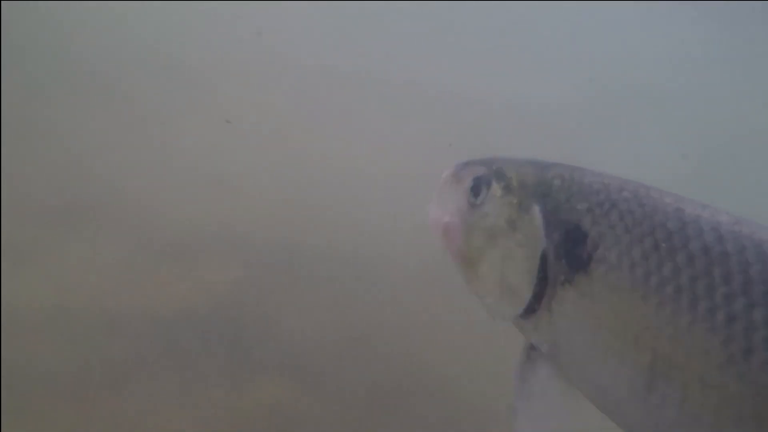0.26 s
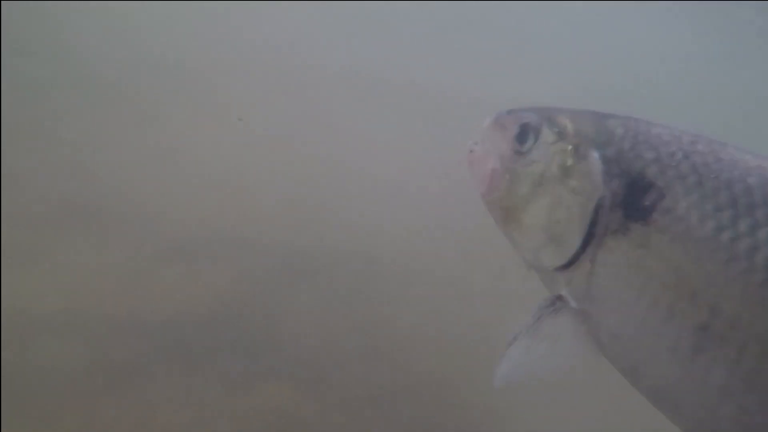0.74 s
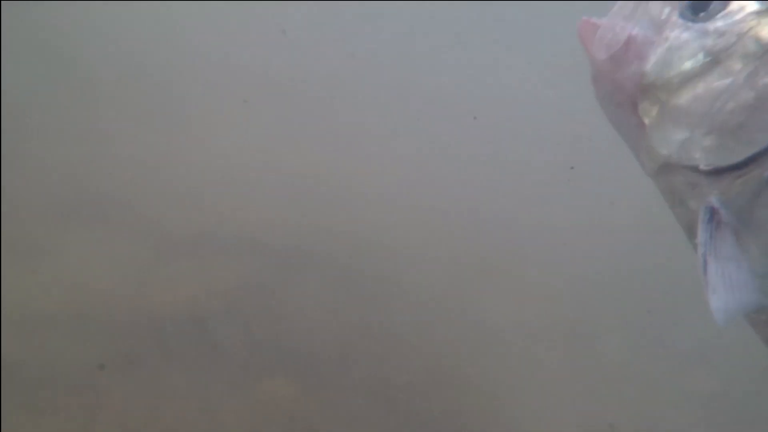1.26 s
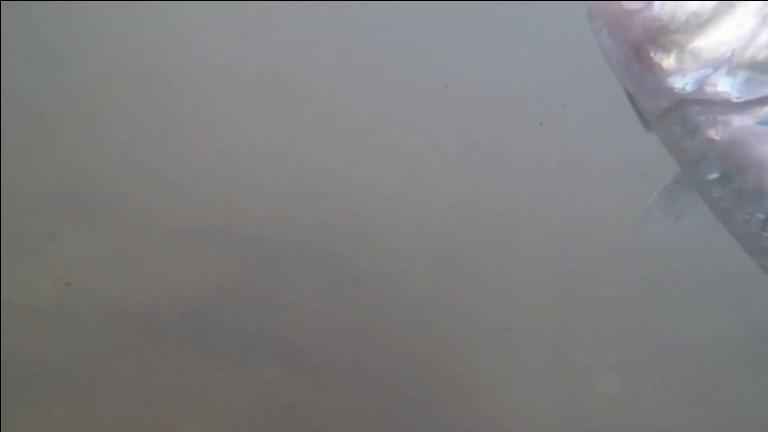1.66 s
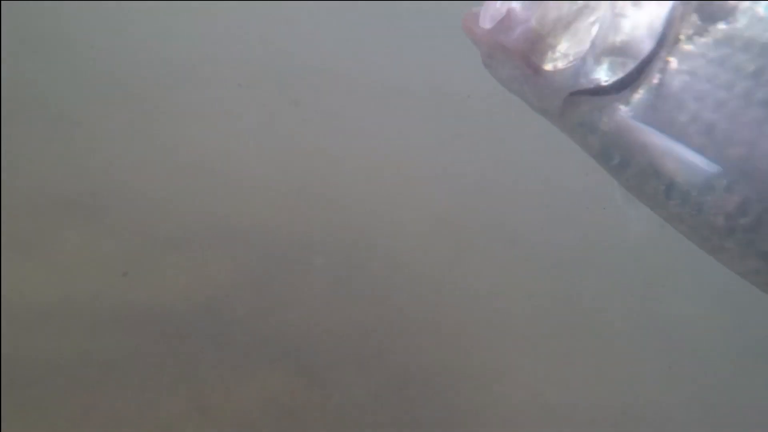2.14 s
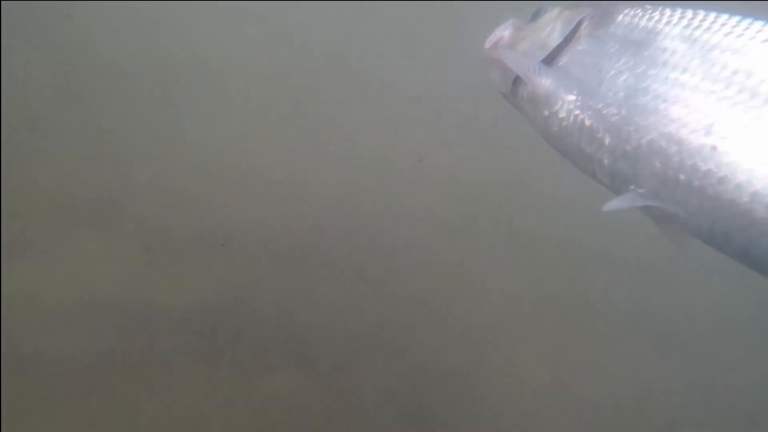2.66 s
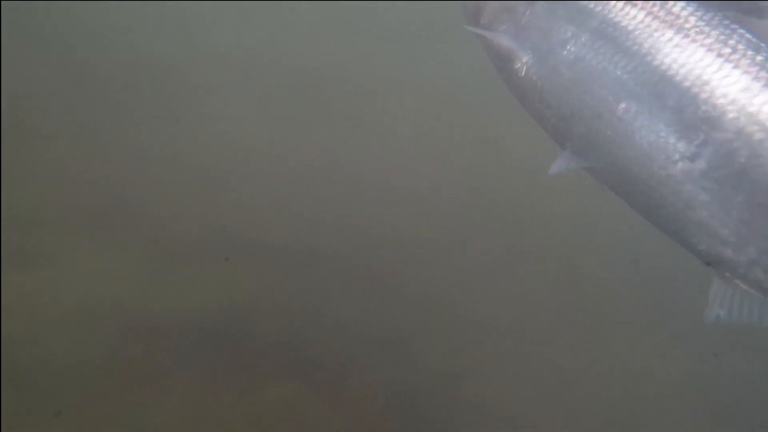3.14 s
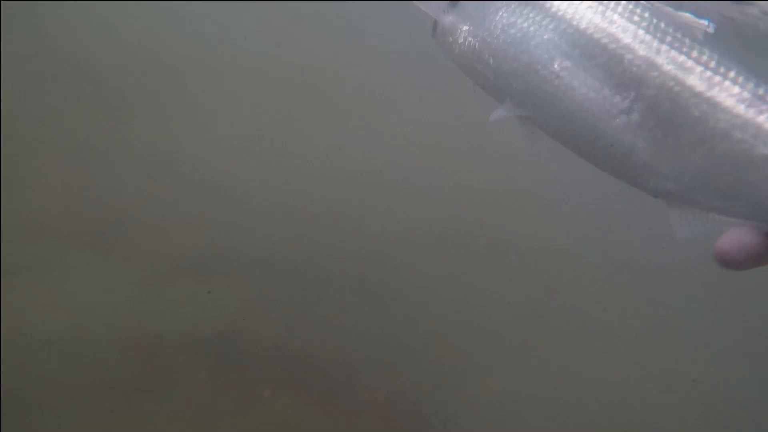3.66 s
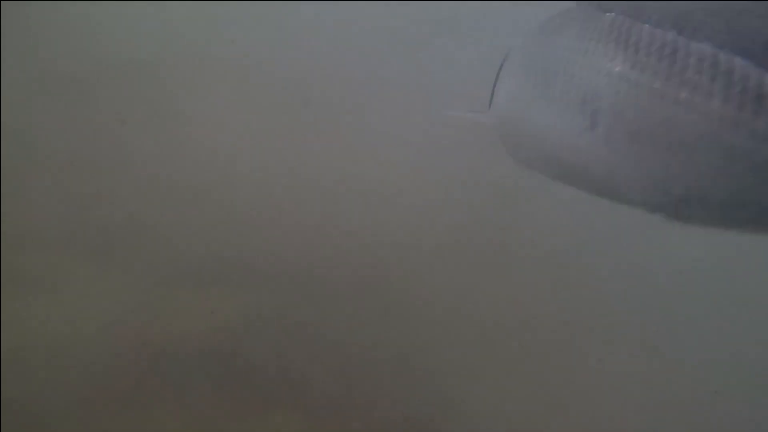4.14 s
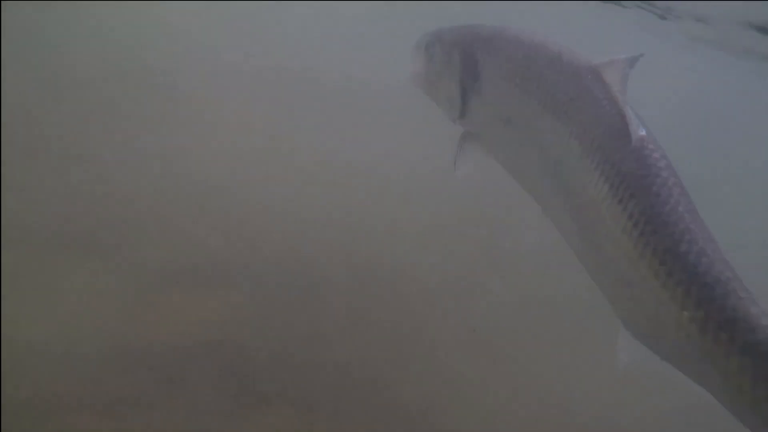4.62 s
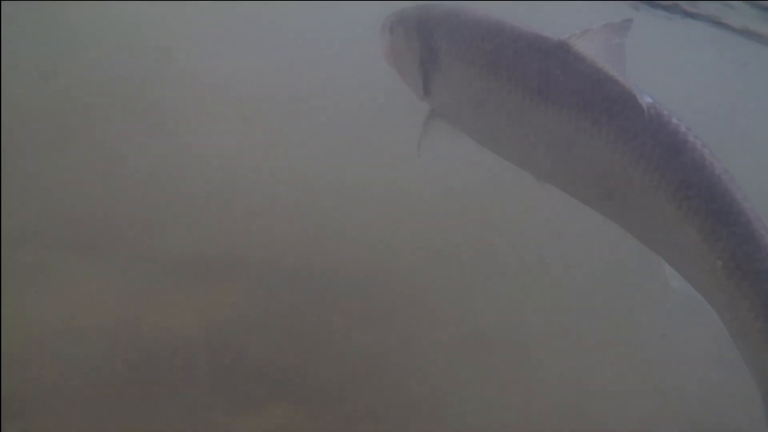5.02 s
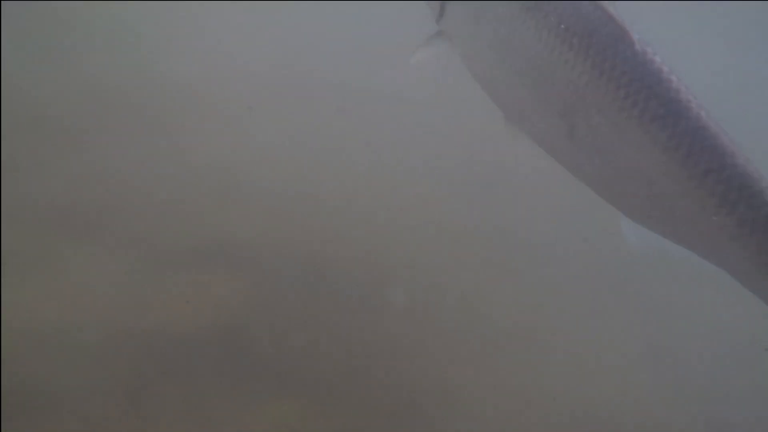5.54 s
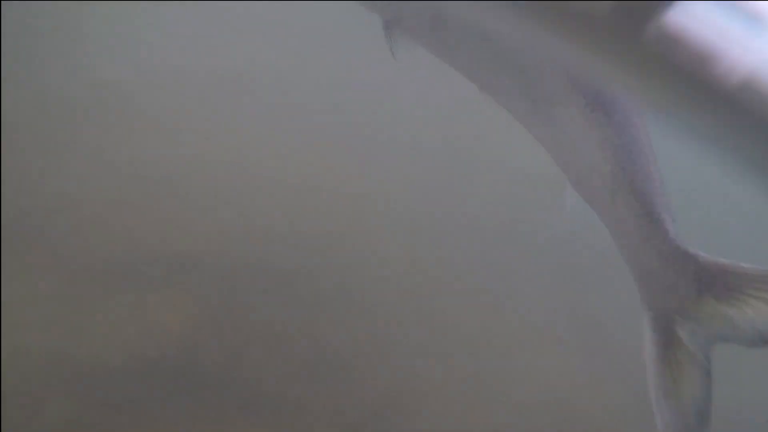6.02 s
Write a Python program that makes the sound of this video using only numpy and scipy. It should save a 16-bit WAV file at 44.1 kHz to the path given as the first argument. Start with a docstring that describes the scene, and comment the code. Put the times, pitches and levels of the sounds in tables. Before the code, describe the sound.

A muffled, surging underwater rumble of river current, with small bubble glugs, soft thumps and a few faint hollow knocks.

```python
"""River water streams round a submerged camera, its turbulent pressure heard as a surging rumble.
The flow drives the hollow housing's resonances and silt prickles on the glass, over the preamp's hiss.
Bubbles glug as damped oscillators and single eddies thump. Drifting grit and the tether knock the shell,
water sloshes along it, and sand and grit tick and snap."""
import sys
import numpy as np
from scipy import signal
from scipy.fft import rfft, irfft
from scipy.io import wavfile
from scipy.ndimage import uniform_filter1d

SR = 44100
rng = np.random.default_rng(int(sys.argv[2]) if len(sys.argv) > 2 else 0)


def inscribe(sig):
    """Save sig as 16-bit PCM at rate SR to the path in sys.argv[1].

    A 1-D sig is mono; a 2-D sig holds one channel per row.
    Samples are clipped to [-1, 1] before scaling.
    """
    pcm = np.round(np.clip(np.atleast_2d(sig).T, -1, 1) * 32767)
    wavfile.write(sys.argv[1], SR, pcm.astype(np.int16))


N = 277210


def undb(db):
    """Decibels to amplitude ratio."""
    return 10 ** (np.asarray(db) / 20)


def at_rms(x, db):
    """Scale x to an rms level."""
    return x * undb(db) / np.sqrt(np.mean(x ** 2))


def spectral_gain(spectrum, hz):
    """Gain of a (frequency_hz, level_db) table, interpolated in log frequency."""
    points_hz, db = np.transpose(spectrum)
    return undb(np.interp(np.log(np.maximum(hz, 1)), np.log(points_hz), db, left=-90))


def wander(rate_hz):
    """Slow random modulation: held values, smoothed twice."""
    hold = int(SR / rate_hz)
    steps = np.repeat(rng.standard_normal(N // hold + 1), hold)
    return uniform_filter1d(uniform_filter1d(steps, hold), hold)[:N]


def steady(x, window_s):
    """Compression: dividing by the running amplitude flattens most swells longer than the window."""
    size = int(window_s * SR)
    power = uniform_filter1d(uniform_filter1d(x ** 2, size), size).clip(0)
    return x / (power + 1e-12) ** .48


def add(out, start_s, x):
    """Superpose x on out from start_s."""
    i = max(int(start_s * SR), 0)
    out[i:i + len(x)] += x[:N - i]


def damped_sine(hz, rise_s, t60_s, octaves_per_s=0):
    """A damped oscillator: it swells to 1, then decays exponentially by 60 dB."""
    t = np.arange(int((rise_s + t60_s) * SR) + 8) / SR - rise_s
    envelope = np.where(t < 0, np.cos(np.pi / 2 * t / rise_s) ** 2, np.exp(-np.log(1000) * t / t60_s))
    return envelope * np.sin(2 * np.pi * np.cumsum(hz * 2 ** (octaves_per_s * t)) / SR)


# Relative strength of the current at the housing: time_s, large_eddies_db, small_eddies_db, shake_db
CURRENT = [(0.0, -34.5, -39.5, -38.5), (0.51, -18, -41.5, -41.5), (0.63, -23, -36.5, -39),
           (0.77, -18.5, -42.5, -39.5), (0.86, -31, -40.5, -42.5), (1.44, -38.5, -49.5, -47.5),
           (1.99, -42, -47, -49.5), (2.38, -19.5, -42, -42), (2.45, -27.5, -39.5, -44.5),
           (2.59, -26, -45.5, -55), (2.78, -34, -49.5, -50), (3.41, -38.5, -41.5, -45.5),
           (3.45, -37.5, -42.5, -55), (3.55, -24.5, -39.5, -42.5), (3.78, -37, -43, -51.5),
           (4.32, -25.5, -46.5, -53), (4.55, -35.5, -47, -54), (4.78, -26, -47, -45),
           (4.8, -28, -48.5, -60), (5.02, -17, -41.5, -48.5), (5.43, -26.5, -36.5, -43.5),
           (6.29, -25.5, -37.5, -42)]
# Big eddies rolling over the housing: centre_s, swell_db, half_length_s
ROLLING_EDDIES = [(0.182, 8.5, 0.075), (0.325, 6, 0.05), (0.789, 11, 0.017), (1.084, 13.5, 0.032),
                  (1.141, 22, 0.015), (1.232, 11.5, 0.028), (1.447, 10, 0.18), (1.751, 15.5, 0.069),
                  (1.957, 13.5, 0.061), (2.114, 10, 0.058), (2.362, 0, 0.045), (1.3, -14, .025),
                  (1.55, -4, .03), (1.874, -15, .03), (2.008, -11, 0.014), (2.625, 6, 0.042),
                  (2.935, 7.5, 0.049), (3.302, 12.5, 0.073), (3.559, 7.5, 0.031), (3.96, 9.5, 0.027),
                  (4.106, 7.5, 0.056), (4.368, 5, 0.043), (4.75, 16, 0.03), (4.815, -5, .025),
                  (4.885, 4, 0.022), (4.933, 3, .02), (5.087, 5, 0.022), (5.15, -7, 0.035),
                  (5.457, 9, 0.016), (6.246, 4, 0.019)]

def current():
    """Unsteady flow: gain curves in dB for large, middle and small eddies and for the shell's shake."""
    t = np.arange(N) / SR
    times_s, *columns = np.transpose(CURRENT)
    large_db, small_db, shake_db = (np.interp(t, times_s, column) for column in columns)
    swell_db = sum(db * np.exp(-((t - centre_s) / half_s) ** 2) for centre_s, db, half_s in ROLLING_EDDIES)
    middle_db = large_db + 0.44 * (small_db - large_db) + 2 + 0.15 * swell_db
    return large_db + swell_db, middle_db, small_db, shake_db


# Relative spectrum of the eddy pressure: frequency_hz, density_db
EDDY_SPECTRUM = [(12, -5.5), (28, -4), (60, -4.5), (110, -17), (180, -17.5), (280, -29), (420, -34)]

def eddy_rumble(large_db, middle_db, small_db):
    """Turbulent pressure in half-octave bands: smaller eddies sound higher and fluctuate faster."""
    hz = np.arange(N // 2 + 1) * SR / N
    pressure = rfft(rng.standard_normal(N)) * spectral_gain(EDDY_SPECTRUM, hz)
    gust_db = 2.0 * wander(18)
    by_size = np.zeros((3, N))
    for centre_hz in 12 * 2 ** np.arange(0, 5.6, .5):
        window = np.clip(1 - 2 * np.abs(np.log2(np.maximum(hz, 1) / centre_hz)), 0, 1)
        flicker_db = gust_db + 5.7 * wander(min(centre_hz / 6, 18))
        size = np.searchsorted([40, 100], centre_hz)  # large below 40 Hz, small above 100 Hz
        by_size[size] += undb(flicker_db) * irfft(pressure * window, N)
    large = at_rms(steady(by_size[0], 0.105), -1.23) * undb(large_db)
    middle = at_rms(steady(by_size[1], 0.13), -0.22) * undb(middle_db)
    small = at_rms(steady(by_size[2], 0.096), 0.95) * undb(small_db)
    return large + middle + small


# Resonances of the hollow housing: pitch_hz, bandwidth_hz, gain_db
SHELL_MODES = [(588.5, 226, 24), (637, 78, 10.5), (790, 520, 6.5), (1020, 150, -14.5), (1213, 120, -10),
               (1787, 100, -20), (2300, 230, -30)]

def shell_modes(force, semitones):
    """Modal response of the housing, as lower and upper groups; clinging air shifts the pitch."""
    rings = []
    for pitch_hz, bandwidth_hz, gain_db in SHELL_MODES:
        hz = 2 ** (semitones / 12) * pitch_hz
        b, a = signal.iirpeak(hz, hz / bandwidth_hz, fs=SR)
        rings.append(undb(gain_db) * signal.lfilter(b, a, signal.lfilter(b, a, force)))  # steep skirts
    return sum(rings[:3]), sum(rings[3:])


def muffled_modes(force, upper_db, semitones):
    """Muffling: the surrounding water dulls the treble that drives the modes."""
    muffled = signal.sosfilt(signal.butter(2, 1600, fs=SR, output="sos"), force)
    lower, upper = shell_modes(muffled, semitones)
    return lower + undb(upper_db) * upper


def shell_shake(shake_db):
    """Forced vibration: turbulence pelts the shell with uneven pushes and sheds small bubbles."""
    force = rng.standard_normal(N) * undb(4.8 * wander(14) + 4.4 * wander(70))
    ring = muffled_modes(force, upper_db=15.3, semitones=0.1)
    fizz = np.zeros(N)
    for start_s, octaves, size in rng.random((60, 3)) * [N / SR, .7, 1]:
        size_db = min(-3.5 * np.log(1 - size), 5)
        bubble = damped_sine(470 * 2 ** octaves, rise_s=0.0033, t60_s=.035, octaves_per_s=4.2)
        add(fizz, start_s, undb(size_db + 1) * bubble)
    return (at_rms(steady(ring, 0.28), -4.0) + fizz) * undb(shake_db)


def silt(shake_db):
    """Random impacts: fine silt prickles on the glass, harder when the water is rough."""
    out = np.zeros(N)
    for start_s, octaves, size_db in rng.random((120, 3)) * [N / SR, 1.5, 6]:
        add(out, start_s, undb(size_db) * damped_sine(4400 * 2 ** octaves, rise_s=0.0003, t60_s=0.0033))
    return out * undb(-35 + .6 * shake_db)


# Relative spectrum of the steady wash and preamp hiss: frequency_hz, density_db
HISS_SPECTRUM = [(200, -2.5), (300, -5.5), (450, -8.5), (600, -5), (900, -19.5), (1500, -19.5), (2400, -25),
                 (3300, -34), (4700, -31.5), (6800, -34.5), (9500, -30.5), (11500, -38), (13500, -44),
                 (14600, -49), (15300, -58)]

def hiss():
    """The noise floor: broadband wash and preamp noise whose level barely moves."""
    hz = np.arange(N // 2 + 1) * SR / N
    noise = irfft(rfft(rng.standard_normal(N)) * spectral_gain(HISS_SPECTRUM, hz), N)
    return at_rms(noise, -49.5) * undb(0.81 * wander(9))


# Ringing air bubbles: peak_s, level_db, pitch_hz, glide_octaves_per_s, rise_s, t60_s
BUBBLE_RINGS = [(.28, -25, 590, -13, 0.0036, 0.027), (1.376, -25.5, 536, 6.5, 0.0059, 0.038),
                (2.212, -22, 691, 3.5, .005, 0.07), (2.235, -26, 710, 3, .008, 0.054),
                (2.25, -31, 718, -4, 0.012, 0.074), (2.202, -34, 1040, 0.5, .002, 0.048),
                (2.203, -28.5, 394, -3, 0.0037, .025), (2.229, -38, 930, -1, .003, .05),
                (2.226, -38.5, 2310, 7, 0.0011, 0.013), (2.242, -50.5, 2820, 5, 0.00285, 0.018),
                (2.251, -40.5, 1640, 4, 0.003, 0.022), (2.26, -43, 1740, 2, 0.0045, 0.027),
                (2.252, -47, 2270, 1, .002, .015), (2.342, -42, 1940, -8, .002, 0.058),
                (2.343, -38, 800, 1, 0.0019, 0.062), (2.422, -39.5, 1280, 5, 0.00196, 0.023),
                (2.493, -23, 655, -0.5, 0.032, 0.038), (2.522, -30.5, 573, -11, .008, 0.049),
                (2.54, -25, 477, -4, .008, 0.026), (2.549, -27.5, 320, -4, 0.0072, 0.042),
                (.477, -25, 668, 1, 0.0087, 0.056), (.572, -34, 755, -1, .012, 0.048),
                (.515, -38, 662, -2, 0.015, .07), (.628, -40, 667, 1, .012, 0.04),
                (.648, -32, 780, 4, .005, .025), (.685, -36, 675, 4, 0.015, .05),
                (.79, -38, 678, 1, 0.018, 0.12), (2.295, -48, 642, 0, .02, .08),
                (2.432, -40, 690, -1, 0.015, .06), (2.197, -26, 678, 5, 0.016, 0.02),
                (2.203, -18, 708, 0.5, 0.003, 0.029), (5.623, -25.5, 683, -9.5, 0.0019, 0.076),
                (0.019, -20, 182, -1.5, 0.016, 0.1), (2.574, -30, 555, 3.5, 0.021, 0.045),
                (2.864, -44.5, 1660, -2, .002, 0.035), (2.963, -22.5, 499, 1, 0.0039, 0.029),
                (2.976, -36, 555, 6, .004, .02), (3.112, -31, 470, 6, 0.0048, 0.018),
                (3.651, -24.5, 490, 7, 0.0053, 0.02), (3.724, -29, 408, 17, 0.0044, 0.032),
                (4.115, -29, 900, -8, 0.0029, 0.03), (4.1246, -16, 552, 14, 0.003, 0.035),
                (4.136, -29, 658, 13, 0.008, 0.025), (4.123, -41, 2220, -2, 0.0012, 0.013),
                (4.151, -37.5, 940, 29, 0.013, 0.034), (4.193, -31.5, 485, 6, 0.0054, 0.05),
                (4.204, -36, 540, 1, 0.0041, .02), (4.214, -31.5, 550, 1, 0.006, 0.07),
                (4.235, -36, 560, 0, 0.012, 0.06), (4.777, -40.5, 520, 2, 0.0059, 0.015),
                (5.188, -28.5, 445, -13, 0.0032, 0.033), (5.623, -27, 1610, -3, 0.0018, 0.024),
                (5.78, -48, 482, -2, 0.0037, 0.042), (6.076, -43, 1180, 22.5, 0.018, 0.07),
                (5.297, -35, 530, 3, .004, .025), (5.34, -34, 484, 3, .005, .03),
                (6.136, -31.5, 368, 8, 0.0039, 0.073)]

def bubbles():
    """Volume resonance: trapped air is a spring against the water; its level wavers as it changes shape."""
    out = np.zeros(N)
    for peak_s, level_db, pitch_hz, glide, rise_s, t60_s in BUBBLE_RINGS:
        add(out, peak_s - rise_s, undb(level_db) * damped_sine(pitch_hz, rise_s, t60_s, glide))
    return out * undb(2.5 * wander(90))


# Single eddies slapping the shell: start_s, level_db, pitch_hz
EDDY_THUMPS = [(0.499, -11, 67.4), (0.928, -14.5, 63.2), (1.033, -24.5, 90), (1.645, -28, 85),
               (2.028, -31, 170), (2.307, -9, 41), (2.347, -14.5, 36), (2.379, -15, 37),
               (4.119, -21.5, 68.3), (4.697, -15.5, 55.6), (5.185, -7, 67.5), (5.538, -15.5, 83),
               (5.721, -16, 69.7), (5.759, -15, 90), (5.831, -18, 73), (6.242, -16, 64.6),
               (2.511, -23, 171), (0.774, -11.5, 55), (5.388, -25.5, 257), (5.429, -26.5, 332),
               (5.471, -26, 284), (5.52, -30, 360), (5.555, -27.5, 310), (0.257, -15.5, 106),
               (0.475, -11.5, 101), (0.623, -16, 125), (0.758, -13.5, 107), (1.372, -28, 121),
               (1.439, -30, 109), (2.19, -18, 150), (2.222, -23, 171), (1.375, -32.5, 263),
               (1.092, -24.5, 160), (2.305, -17.5, 144), (2.482, -22, 141), (2.889, -28.5, 190),
               (3.365, -21.5, 171), (3.389, -21.5, 166), (3.493, -23.5, 115), (3.546, -21, 145),
               (3.696, -32, 177), (5.022, -19.5, 117), (5.185, -11, 98), (5.208, -15, 173),
               (5.305, -20, 122), (5.394, -16.5, 111), (5.571, -17.5, 178), (5.674, -19.5, 175),
               (6.085, -15.5, 118)]

def eddy_thumps():
    """Pressure pulses: each slap is a heavily damped oscillation, longer when it is lower."""
    out = np.zeros(N)
    for start_s, level_db, pitch_hz in EDDY_THUMPS:
        thump = damped_sine(pitch_hz, rise_s=0.68 / pitch_hz, t60_s=0.043 + 1.65 / pitch_hz)
        add(out, start_s, undb(level_db) * thump)
    return out


# Grit and the tether striking the shell: start_s, level_db, shift_semitones
SHELL_KNOCKS = [(0.358, -35, 0), (0.472, -24, 0.5), (0.562, -29, 0), (0.626, -36, 1.5), (0.647, -28.5, 2.5),
                (0.719, -32, 3.5), (.736, -33, 0.5), (1.138, -28.5, -3.5), (1.369, -40, -1),
                (1.445, -34, -1.5), (2.2008, -13.5, 2.5), (2.226, -22, 3), (2.338, -33, 4),
                (2.418, -31.5, 0), (2.665, -32.5, -2), (2.893, -29, 0.5), (2.959, -28, 0.5),
                (3.109, -42, 4), (3.366, -41, 4), (3.556, -33, 0), (4.095, -33, -2), (4.112, -26.5, 2.5),
                (4.251, -33, 1.5), (5.126, -38, -6), (5.321, -28.5, -0.5), (5.554, -33, 1.5),
                (5.621, -26, 5.5), (5.837, -37, 4.5), (6.155, -29, 2)]

def knocks(contact_s=0.00053, rattle_t60_s=0.086, upper_db=-26):
    """Impulse excitation: a brief push and a rattle of noise set the shell's modes ringing."""
    out, t = np.zeros(N), np.arange(SR // 4) / SR
    push = 9000 * t * np.exp(-t / contact_s)
    for start_s, level_db, semitones in SHELL_KNOCKS:
        rattle = 0.16 * rng.standard_normal(len(t)) * np.exp(-np.log(1000) * t / rattle_t60_s)
        lower, upper = shell_modes(push + rattle, semitones)
        ring = lower / np.abs(lower).max() + undb(upper_db) * upper / np.abs(upper).max()
        add(out, start_s, undb(level_db) * ring)
    return out


# Water sliding along the wall: centre_s, level_db, upper_modes_db, half_length_s, shift_semitones
WALL_SLOSHES = [(.39, -43, -3, 0.027, 1.5), (.452, -41, 12, 0.0092, 2), (0.479, -26.5, 20.5, 0.016, 1),
                (0.568, -30.5, 11, 0.019, 2), (0.643, -35, 8, 0.012, 3.5), (0.729, -33, 12, 0.018, 1.5),
                (0.808, -42, 3, 0.017, 0.5), (1.377, -51, 1.5, 0.015, .1), (2.233, -35.5, 3, 0.023, 1),
                (3.387, -41, -9, 0.018, 2), (3.556, -38.5, 10, 0.0066, 1), (4.121, -37.5, 10, 0.015, 3),
                (4.152, -45, 12, 0.0097, 2.5), (5.258, -40.5, 3, .012, -1), (5.42, -41, -6, 0.03, -7.5),
                (5.535, -38, 3, 0.035, -5.5), (5.656, -41.5, 28, 0.038, 0.7)]

def sloshes():
    """Flow excitation: sliding water drives the shell's modes in a bell-shaped swell of noise."""
    out, t = np.zeros(N), np.arange(SR // 4) / SR - 1 / 8
    for centre_s, level_db, upper_db, half_s, semitones in WALL_SLOSHES:
        swell = np.exp(-(t / half_s) ** 2)
        slosh = swell * muffled_modes(rng.standard_normal(len(t)), upper_db, semitones)
        add(out, centre_s + t[0], at_rms(slosh, level_db) * np.sqrt(np.mean(swell ** 2)))
    return out


# Sand grains striking the glass: start_s, level_db, pitch_hz, overtone_trim_db
SAND_TICKS = [(.5182, -51, 5700, -20), (1.2356, -39, 9200, -18), (2.22, -49, 8000, -20),
              (2.258, -45, 6030, -20), (3.649, -43, 8600, -16), (4.095, -49, 7400, -18),
              (4.115, -47, 7600, -16), (4.1996, -32.5, 8850, -17), (4.579, -45, 9690, -14),
              (4.6877, -46, 5700, -20), (4.744, -33, 9200, -4), (4.761, -50, 9400, -18),
              (4.775, -49, 8800, -18), (5.2964, -40.5, 8100, 0)]

def sand_ticks():
    """Hard, brief contact excites high modes: a main ring and two weaker, inharmonic overtones."""
    out = np.zeros(N)
    for start_s, level_db, pitch_hz, trim_db in SAND_TICKS:
        add(out, start_s, undb(level_db) * damped_sine(pitch_hz, rise_s=0.00029, t60_s=0.0027))
        for overtone_hz in (11600, 13900):
            overtone = damped_sine(overtone_hz, rise_s=0.00021, t60_s=.0021)
            add(out, start_s, undb(level_db + trim_db - 4) * overtone)
    return out


# Dry snaps of grit: start_s, level_db, pitch_hz
GRIT_SNAPS = [(.602, -38, 1250), (.728, -47, 2000), (.866, -44, 2500), (2.2, -48, 2100),
              (2.2245, -36, 1900), (2.339, -33, 1800), (2.398, -40, 2270), (5.507, -40, 1200),
              (5.572, -48, 2100), (2.6653, -40, 1400), (2.893, -43, 1350), (3.11, -43, 1300),
              (5.187, -42, 1200), (2.9577, -43, 1600), (4.096, -37, 1100), (4.5518, -35.5, 1470),
              (5.1257, -43, 1290), (5.622, -22, 1180), (5.89, -39, 1450), (6.1497, -37, 1810)]

def grit_snaps(decay_cycles=4.5):
    """Heavy damping: each impact dies within a few cycles and is heard as a click."""
    out = np.zeros(N)
    for start_s, level_db, pitch_hz in GRIT_SNAPS:
        snap = damped_sine(pitch_hz, rise_s=0.00088, t60_s=decay_cycles / pitch_hz)
        add(out, start_s, undb(level_db) * snap)
    return out


def scene():
    """Superposition: all the sources sum in one channel."""
    large_db, middle_db, small_db, shake_db = current()
    flow = eddy_rumble(large_db, middle_db, small_db) + shell_shake(shake_db) + silt(shake_db)
    return (flow + hiss() + bubbles() + eddy_thumps() + knocks() + sloshes()
            + sand_ticks() + grit_snaps())[None]


def record(dry):
    """Band limiting: the recorder's steep low-pass cuts the treble above 15.3 kHz."""
    return signal.sosfilt(signal.ellip(8, .2, 70, 15300, fs=SR, output="sos"), dry)


dry = scene()
out = record(dry)
inscribe(out)
```